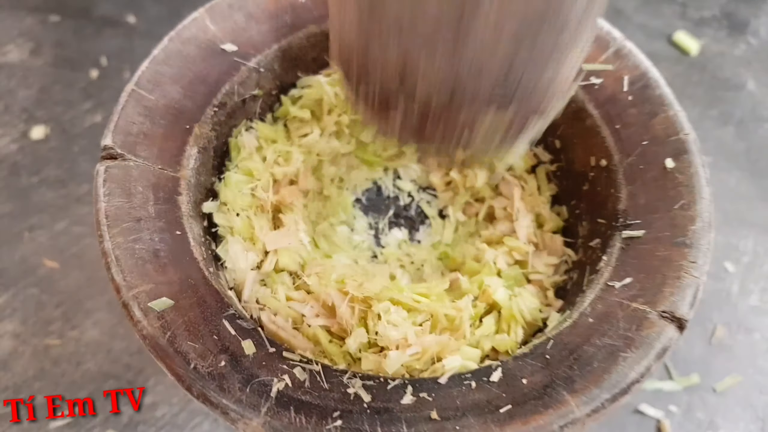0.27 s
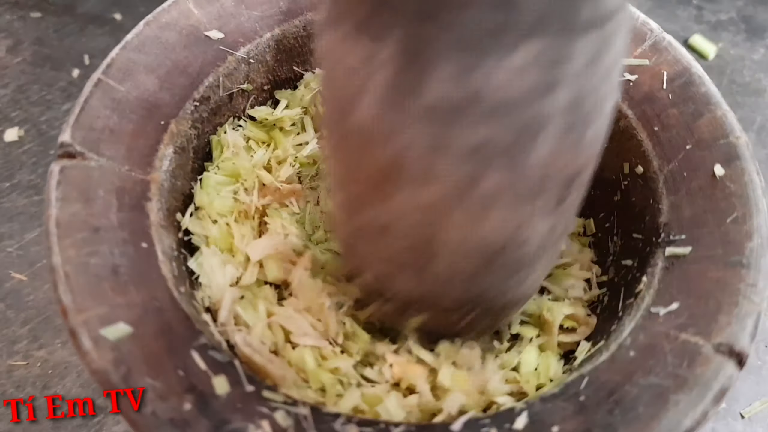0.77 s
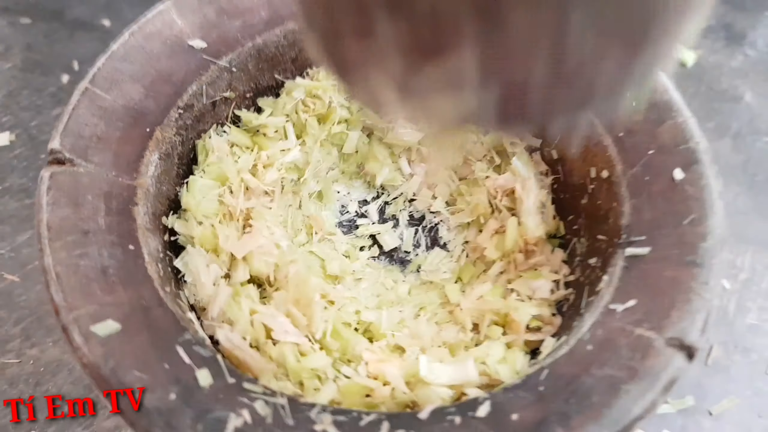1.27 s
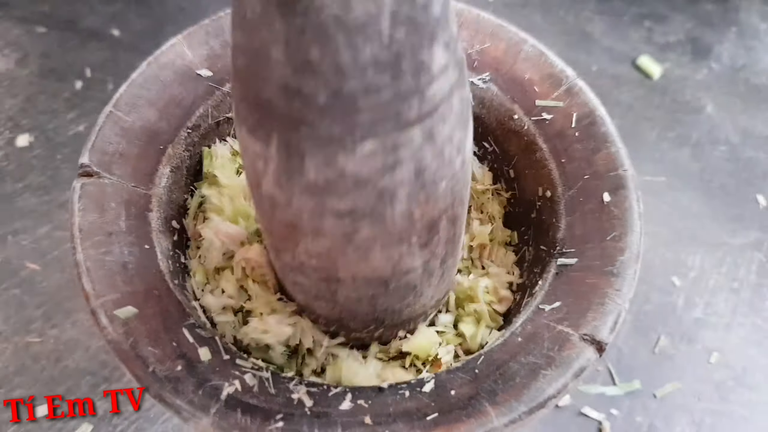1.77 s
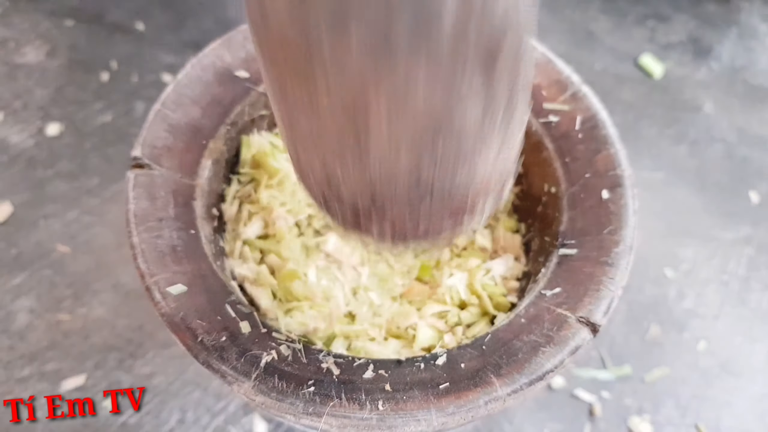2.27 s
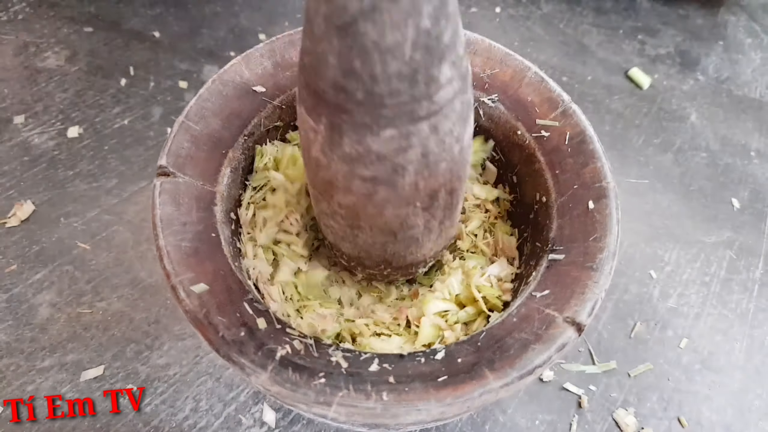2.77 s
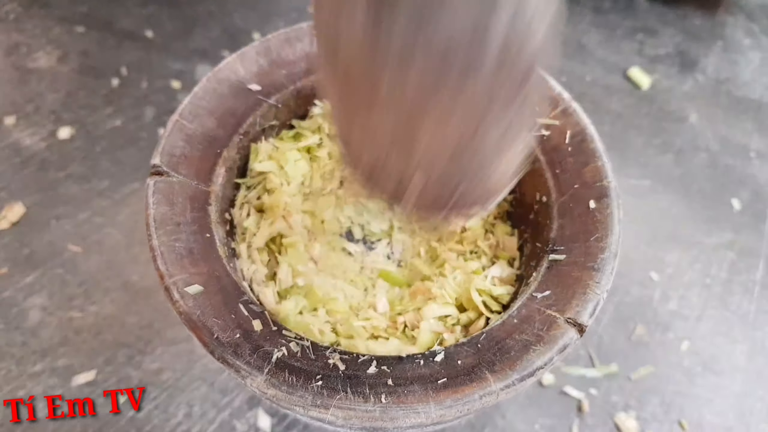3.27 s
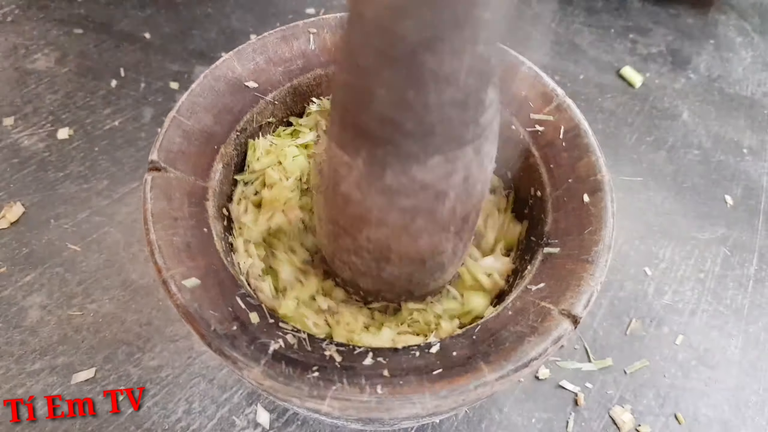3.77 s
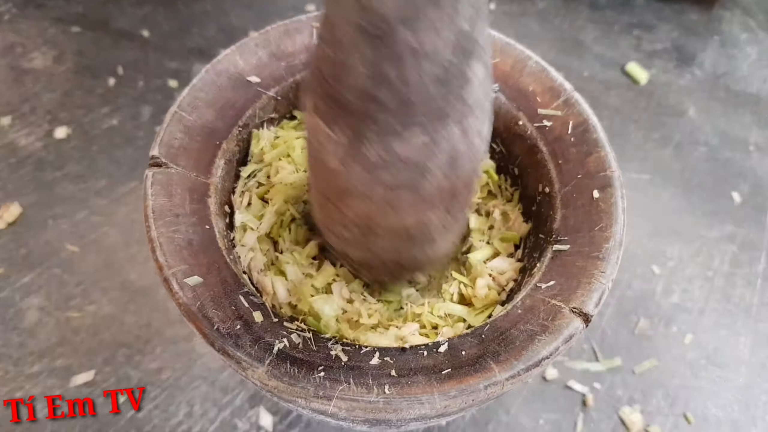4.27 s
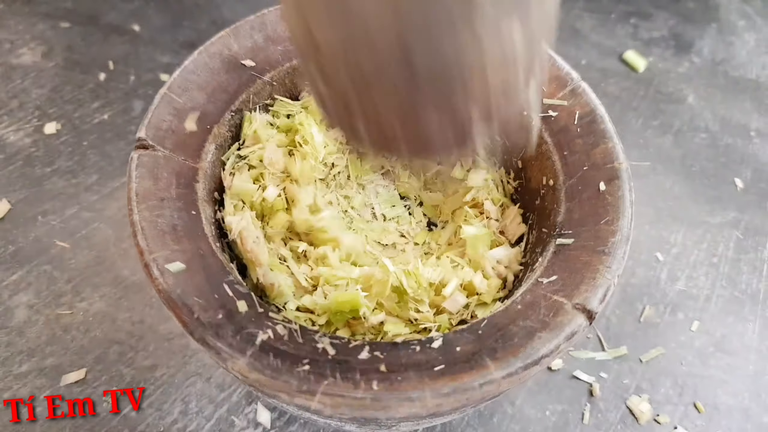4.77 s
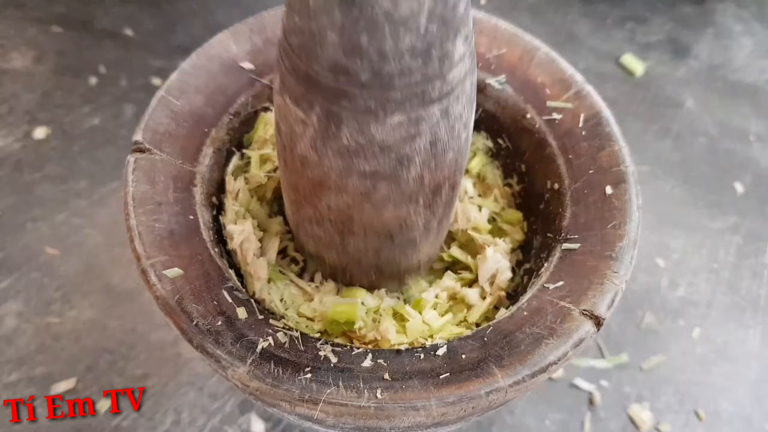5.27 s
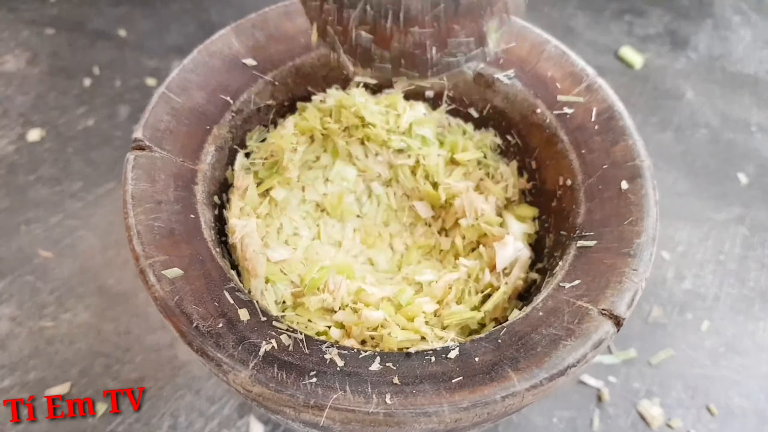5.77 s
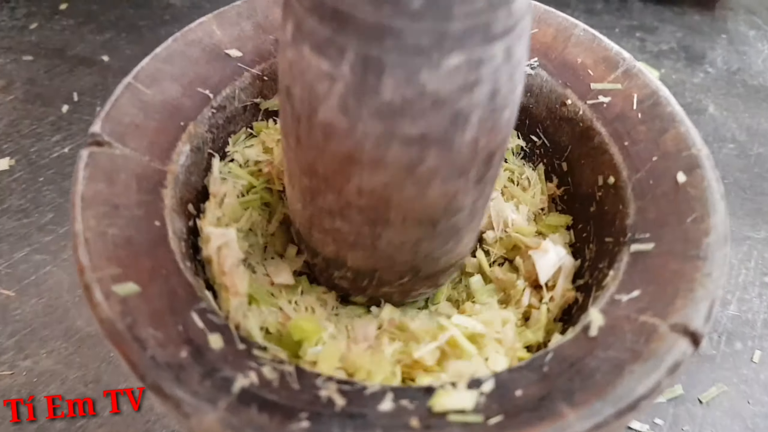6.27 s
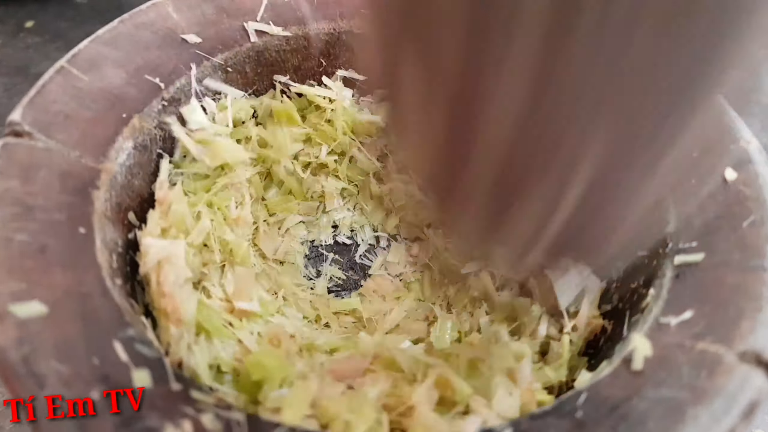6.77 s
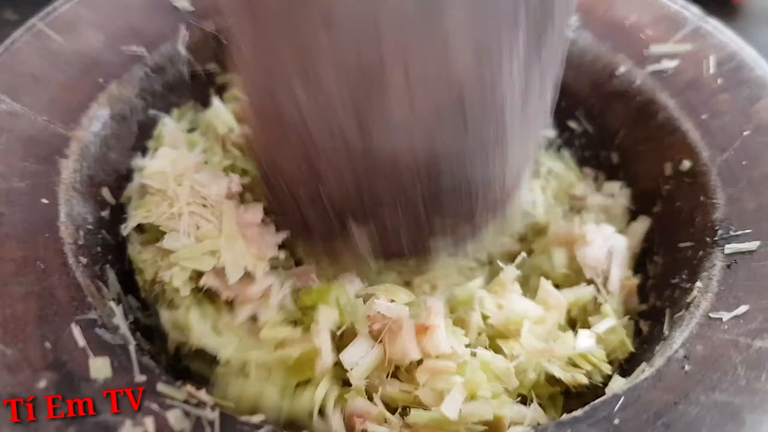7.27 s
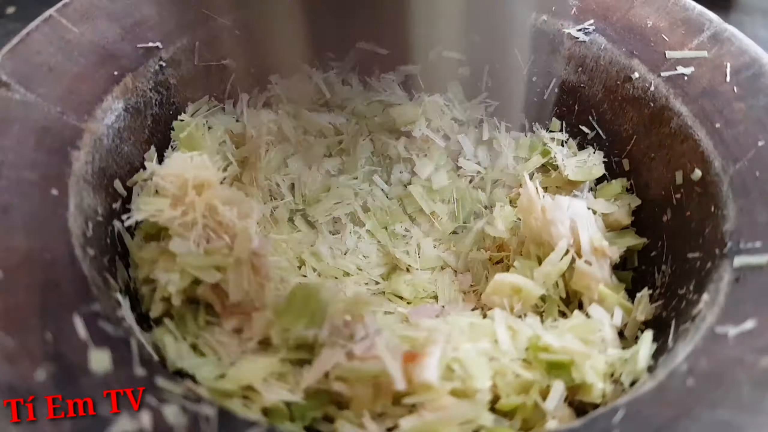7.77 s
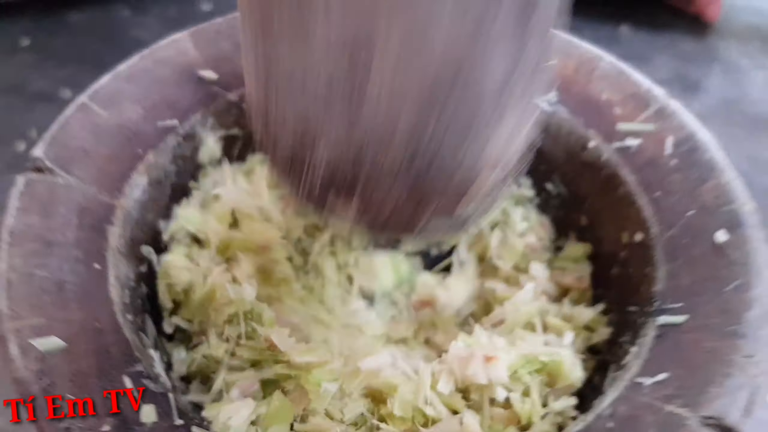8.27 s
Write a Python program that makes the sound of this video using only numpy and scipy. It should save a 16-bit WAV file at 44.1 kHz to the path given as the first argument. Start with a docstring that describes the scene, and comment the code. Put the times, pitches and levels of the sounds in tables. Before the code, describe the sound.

Close to a phone microphone, a heavy wooden pestle pounds chopped lemongrass in a wooden mortar about three times a second. Each stroke combines a short fibrous crunch, a dull low thud and a sharp woody knock, often doubled as the mortar rocks. The small hard kitchen adds a brief tail. Faint hiss and room murmur continue beneath, with two barely audible far coos and one distant clink.

```python
"""Microphone hiss and a low room murmur run from start to end, drifting in level.
From 0.1 s a wooden pestle pounds chopped lemongrass in a wooden mortar, three strokes a second, close to a phone:
noise grains make the crunch, fading low tones the thud, then short tones and filtered noise the knock of wood on
wood, often twice as the mortar rocks. A small hard kitchen answers each blow with a short noise tail.
A faint far coo, a narrow band of noise, calls at 1.3 s and 5.4 s; a far clink of short tones sounds at 6.4 s."""
import sys
import numpy as np
from scipy import signal
from scipy.fft import rfft, irfft, next_fast_len
from scipy.io import wavfile

SR = 44100
rng = np.random.default_rng(int(sys.argv[2]) if len(sys.argv) > 2 else 0)


def wrap_up_sound(samples):
    """Save the sound to the file named by the first command line argument, as 16-bit audio."""
    columns = np.atleast_2d(samples).T
    # keep every value between -1 and 1, then stretch to whole-number steps
    tamed = np.clip(columns, -1, 1)
    steps = np.round(tamed * 32767).astype(np.int16)
    wavfile.write(sys.argv[1], SR, steps)


def invert_db(x):
    """Field ratio 10**(x/20) for x, a level in decibels (scalar or array-like)."""
    u = np.asarray(x, float) / 20
    return 10 ** u


N = 374850  # samples in the scene: 8.5 s

# All levels are relative: each source sets its own balance.
# The pestle lands in the pulp: (t/s, crunch level/dB, thud level/dB, floor shake level/dB)
LANDINGS = [(0.103, -48, -70.5, -74), (0.1286, -26, -28, -42.5), (0.5023, -27, -31.5, -45),
            (0.8125, -38.5, -44.5, -50.5), (1.058, -44.5, -70, -75.5), (1.1457, -30, -28.5, -46),
            (1.514, -26, -33.5, -43), (1.8141, -33.5, -35, -55), (2.1542, -29, -36.5, -54),
            (2.4815, -22, -21.5, -34), (2.8372, -19.5, -22.5, -31), (3.1922, -18.5, -18.5, -38),
            (3.5482, -18.5, -17, -44), (3.864, -23, -31.5, -48), (4.227, -16.5, -22, -39),
            (4.5751, -29, -27.5, -50.5), (4.582, -19, -35, -38), (4.9179, -18.5, -17.5, -41.5),
            (5.258, -24.5, -31.5, -64), (5.5975, -26.5, -29, -44), (5.949, -28.5, -35.5, -46.5),
            (6.2714, -22, -20.5, -31), (6.583, -26, -24, -33), (6.9017, -21, -22.5, -32),
            (7.233, -24, -22, -31.5), (7.5526, -22.5, -30.5, -36.5), (7.906, -23.5, -19, -39),
            (8.2228, -22, -28, -30.5), (8.3641, -35, -60, -73)]
# Wood on wood: (t/s, whole level/dB, belly level/dB, rim level/dB, ringing level/dB).
# Deep pulp feeds the belly, a blow high on the wall feeds the rim.
KNOCKS = [ (.1307, -8.5, -26, 4, -13), (0.1366, -15, -22.5, 3.5, -1.5), (.505, -10, -5.5, -1, -12),
          (.516, -3.5, -22, -23.5, -19.5), (0.819, -25.5, -19, -26, -15.5), (.841, -45, -2, -9.5, -11.5),
          (1.066, -60, 2.5, 6.5, -1), (1.147, -21, 1, -5.5, -11), (1.156, -13.5, -16, -18, -24.5),
          (1.528, -6.5, -15, -14.5, -15.5), (1.815, -16, -26, -13, -11), (1.838, -4.5, -31.5, -13.5, -15),
          (2.162, -5.5, -41.5, -6.5, -10.5), (2.174, -17, -11.5, -12, -8.5),
          (2.48, -18.5, -8.5, -14, -13.5), (2.841, -7, -7.5, -8.5, -16), (2.849, -25.5, -19, -14.5, -4.5),
          (3.194, -4, -6, -5.5, -14), (3.55, -11, -0.5, -5.5, -13.5), (3.558, -16, -27, -15.5, -17),
          (3.871, -6, -33.5, -16, -9.5), (4.229, -14, -10, -8.5, -7.5), (4.238, -3, -25, -14, -17.5),
          (4.573, -6, -27, -1.5, -11), (4.578, -17, -12, -11.5, -1), (4.599, -5.5, -27, -2.5, -7),
          (4.61, -19, -19.5, 1.5, -4.5), (4.921, -11, -7.5, -11.5, -16.5), (5.269, -4, -35.5, -15.5, -11),
          (5.613, -4, -32.5, -15.5, -10), (5.624, -28, -0.5, 5.5, -3), (5.961, -5, -18.5, -19.5, -14.5),
          (6.2722, -6.5, -31, -18.5, -16), (6.3118, -27.5, -9, -20, -13), (6.5812, -9, -3, -0.5, -8),
          (6.911, -15.5, -13.5, -13, -16), (7.236, -7.5, -17, -3, -9), (7.258, -14.5, -6.5, -26, -11.5),
          (7.2683, -7, -40, -4.5, -12), (7.281, -25.5, -3.5, -15, -5), (7.2963, -14, -16, -17, -15),
          (7.552, -7, -13.5, -1, -14), (7.579, -6.5, -35.5, -23, -10.5), (7.583, -9.5, -8, -6, -6),
          (7.909, -9.5, -7.5, -3.5, -20), (8.225, -3.5, -24, -12.5, -17.5),
          (8.242, -2.5, -25, -17.5, -14.5), (8.2744, -19.5, -6.5, -24, -12), (8.365, -33.5, -3.5, 2, -8.5),
          (8.405, -52, 6.5, -9, -10.5)]
# The broad knock of belly, wall, rim and edge: (f/Hz, width/Hz, level/dB)
KNOCK_PARTS = [(506, 544, 4.5), (1208, 720, 3.5), (1770, 915, 6), (3230, 1600, 9.5)]
# Borders between those four parts: f/Hz
PART_BORDERS = [750, 1500, 2600]
# Tones at which mortar and pestle ring freely: (f/Hz, level/dB, time to fall 60 dB/s)
WOOD_TONES = [(490, -1, .16), (576, -7, .08), (670, -1, .09), (865, -3, .1), (1035, -4, .08),
              (1170, -6, .06), (1270, -5, .07), (1480, -3, .06), (1600, -5, .06), (1725, .5, .08),
              (2120, -8, .06), (2300, -7, .08), (2450, -8, .07), (3330, -7, .04), (3470, -4, .06),
              (5340, -20, .03)]
# The mortar thudding on the floor: (f/Hz, level/dB, time to fall 60 dB/s)
THUD_TONES = [(198, -9, .36), (245, -11, .16), (328, -9, .2), (405, -11, .12)]
# The floor slab shaking: (f/Hz, level/dB, time to fall 60 dB/s)
SLAB_TONES = [(47, -2.5, 0.74), (57.4, 9.5, 0.33), (100, -3.5, 0.083), (121, -2.5, 0.083)]
# Tone colour of the snapping fibres: (f/Hz, level/dB)
FIBRE_COLOUR = [(800, -24.5), (2500, 0.5), (5000, -1.5), (7800, -6), (10500, 2.5), (15000, -11.5),
                (16600, -24.5)]
# Something set down across the room: (t/s, level/dB)
CLINKS = [(6.416, -31.5)]
# The tones of that clink: (f/Hz, level/dB, time to fall 60 dB/s)
CLINK_TONES = [(1245, -2, .05), (1300, -6, .07), (1960, -10, .02), (2336, -9, .02)]
# Calls of the far coo: (start t/s, length/s, level/dB)
COO_CALLS = [(1.27, 1.18, -76), (5.42, .82, -75)]
# The background drifts: (t/s, hiss level/dB)
BACKGROUND_DRIFT = [(0.0, -67), (0.38, -71.5), (0.871, -73), (1.68, -69), (2.402, -68.5), (2.602, -64.5),
                    (4.588, -62), (4.708, -64), (5.999, -64.5), (6.441, -63), (7.9, -66), (8.5, -65)]
# Tone colour of the hiss: (f/Hz, level/dB)
HISS_COLOUR = [(400, -11.5), (1300, -2.5), (4700, -3.5), (7800, -7.5), (8900, -1.5), (11600, -1.5),
               (15100, -3), (15800, -32.5)]
# Tone colour of the murmur: (f/Hz, level/dB)
MURMUR_COLOUR = [(18, -26), (32, -1), (60, 11), (190, -1.5), (480, -8), (900, -11), (1800, -39.5)]
# How alike the murmur is on left and right: (f/Hz, likeness, 1 = fully alike)
MURMUR_ALIKE = [(60, 1), (290, 0.28), (640, 0.89), (1400, .05)]
# How far the right port lags behind the left: (f/Hz, lag/radians)
PORT_LAG = [(100, .01), (700, 0.076), (1100, 1.7), (1600, 0.4), (2150, 3.8), (2700, 6.6), (16000, 35)]
# Port balance before the turn of the phone: (f/Hz, left minus right level/dB)
PORT_TILT = [(50, 9), (130, 2.5), (1500, 5), (2100, -6.5), (3000, 5), (5000, 12.5), (14000, 11)]
# How fast the room dies away: (f/Hz, time to fall 60 dB/s)
ROOM_DECAY = [(100, 0.077), (500, 0.34), (2000, 0.22), (5000, .22), (12000, 0.29)]
# The phone turns, which moves the balance: (t/s, added left minus right level/dB)
PHONE_TURN = [(0, -2), (5.5, -1), (7.2, -0.5), (8.5, 0.5)]

SPAN, LEAD = 16384, 512  # samples a blow may last; samples kept before each blow
BLOW_TIME = np.arange(SPAN) / SR  # s
BLOW_HZ = np.fft.rfftfreq(SPAN, 1 / SR)


def unit(x):
    """Scale a sound so that its average power is 1."""
    return x / np.sqrt(np.mean(x ** 2) + 1e-20)


def along(points, hz):
    """Read a value between (f/Hz, value) points, on a log frequency axis."""
    f, value = np.transpose(points)
    return np.interp(np.log(hz + 1), np.log(f + 1), value)


def filtered(x, response):
    """Make each frequency stronger or weaker, as the response function says."""
    size = next_fast_len(x.shape[-1] + SR // 4)
    spectrum = rfft(x, size) * response(np.fft.rfftfreq(size, 1 / SR))
    return irfft(spectrum, size)[..., :x.shape[-1]]


def ring(tones, scatter_db, attack, flutter):
    """Fading tones, one per row; slow random noise roughens each tone in size and phase."""
    hz, db, t60 = np.transpose(tones)[:, :, None]
    chance = rng.standard_normal((len(tones), 1))  # a new strength for every blow
    knots = rng.standard_normal((2, len(tones), SPAN // 256 + 2))  # new random values every 6 ms
    step, rest = np.divmod(np.arange(SPAN), 256)
    slow = knots[..., step] * (1 - rest / 256) + knots[..., step + 1] * rest / 256
    angle = 2 * np.pi * hz * BLOW_TIME
    wave = (1 + flutter * slow[0]) * np.sin(angle) + flutter * slow[1] * np.cos(angle)
    fade = invert_db(db + scatter_db * chance - 60 * BLOW_TIME / t60)
    return fade * (1 - np.exp(-BLOW_TIME / attack)) * wave


def heard(sound, wet_db):
    """Direct sound reaches the two microphone ports; walls add a noise tail that dies at its own rate per pitch."""
    hz, t, z = signal.stft(rng.standard_normal((2, SPAN)), SR, nperseg=256)
    fade = invert_db(-60 * t / along(ROOM_DECAY, hz)[:, None])
    tail = signal.istft(z * fade, SR, nperseg=256)[1][:, :SPAN]
    tail = tail * np.clip(BLOW_TIME / 0.0017, 0, 1) / np.linalg.norm(tail[0])  # fades in over 1.7 ms
    lag = np.interp(BLOW_HZ, *np.transpose(PORT_LAG))
    balance = invert_db(np.outer([.5, -.5], along(PORT_TILT, BLOW_HZ)))
    ports = balance * [np.ones_like(lag), np.exp(-1j * lag)]
    both = irfft(rfft(sound) * (ports + invert_db(wet_db) * rfft(tail)))
    both = np.roll(both, LEAD, axis=1)
    return both * signal.windows.tukey(SPAN, 2 * LEAD / SPAN)


def add(track, s, sound):
    """Mix in a stereo sound at time s, with the left-right balance that the turn of the phone gives."""
    turn_db = np.interp(s, *np.transpose(PHONE_TURN))
    start = round(s * SR) - LEAD
    track[:, start:][:, :SPAN] += sound * invert_db(turn_db * np.array([[.5], [-.5]]))


def softened_by_pestle(hz):
    """Wood is too soft to click; the blow also runs up the pestle and returns, again and again."""
    soft = 1 / (1 + 1j * hz / 6000) ** 4
    return soft / (1 - .25 * np.exp(-2j * np.pi * hz * .00197))  # each return is 1.97 ms later, at a quarter


def knocks():
    """A very short contact sets off four broad parts of the wood and its fading tones; bare blows fill the room more."""
    out, t = np.zeros((2, N + SPAN)), BLOW_TIME
    hz, width, db = np.transpose(KNOCK_PARTS)[:, :, None]
    part_of_tone = np.searchsorted(PART_BORDERS, [tone[0] for tone in WOOD_TONES])
    for s, whole_db, belly_db, rim_db, ringing_db in KNOCKS:
        edge_db = -9.5 + 0.95 * rim_db  # the edge under the rim follows the rim
        parts = invert_db(db + [[belly_db], [0], [rim_db], [edge_db]])
        decay = np.pi * width * t
        pitch = hz * rng.normal(1, .03, (4, 1))
        broad = np.e * decay * np.exp(-decay) * np.sin(2 * np.pi * pitch * t)
        tones = ring(WOOD_TONES, scatter_db=2.5, attack=.002, flutter=1.5)
        # loose pulp rattles on the wall
        grit = filtered(rng.standard_normal(SPAN), lambda f: 1 / (1 + ((f - 3900) / 1800) ** 6))
        broad[3] += invert_db(ringing_db - 0.5 - 60 * t / 0.073) * grit
        contact = filtered((parts * broad).sum(0), softened_by_pestle)
        ringing = invert_db(ringing_db - 12) * (parts[part_of_tone] * tones).sum(0)
        add(out, s, heard(invert_db(whole_db) * (contact + ringing), wet_db=ringing_db - 4))
    return out[:, :N]


def landings():
    """Fibres snap in a dense burst under the pestle; the weight thuds through the mortar into the floor."""
    out, t = np.zeros((2, N + SPAN)), BLOW_TIME
    for s, crunch_db, thud_db, shake_db in LANDINGS:
        # noise whose strength jumps every 16 samples
        grains = rng.standard_normal(SPAN) * invert_db(3 * rng.standard_normal(SPAN // 16).repeat(16))
        fibres = unit(filtered(grains, lambda hz: invert_db(along(FIBRE_COLOUR, hz))))
        crush = np.e * t / 0.0015 * np.exp(-t / 0.0013)
        settling = invert_db(-16.5 - 60 * t / 0.08)  # the pulp settles after the crush
        crunch = invert_db(crunch_db - 7.5) * (crush + settling) * fibres
        push = 2.6 * np.sin(2 * np.pi * 270 * t) * invert_db(-60 * t / .028)
        mortar = ring(THUD_TONES, scatter_db=2, attack=.003, flutter=.55).sum(0)
        thud = invert_db(thud_db - 4) * (push + mortar)
        give = (t / .016 * np.exp(1 - t / .016)) ** 3  # the slab gives once, a little late: strongest at 16 ms
        jolt = 2.5 * np.sin(2 * np.pi * 58 * t) * give
        slab = ring(SLAB_TONES, scatter_db=2, attack=.02, flutter=.6).sum(0)
        shake = invert_db(shake_db - 6.5) * (jolt + slab)
        add(out, s, heard(crunch + thud, wet_db=-11))
        add(out, s, heard(shake, wet_db=-15) * invert_db([[2.5], [-2.5]]))  # stronger on the left
    return out[:, :N]


def clink():
    """A far clink: short tones and a burst of noise, with a strong room tail."""
    out = np.zeros((2, N + SPAN))
    for s, db in CLINKS:
        tones = ring(CLINK_TONES, scatter_db=1, attack=.0015, flutter=.5).sum(0)
        burst = rng.standard_normal(SPAN) * invert_db(-60 * BLOW_TIME / 0.017)
        tap = 1.9 * filtered(burst, lambda hz: 1 / (1 + ((hz - 2200) / 1300) ** 4))
        both = heard(invert_db(db) * (tones + tap), wet_db=-1.5)
        add(out, s, both[::-1])  # left and right swapped
    return out[:, :N]


def coo():
    """A narrow band of noise makes a fuzzy tone from far outside, strongest near the start and end of each call."""
    t, level = np.arange(N) / SR, 0
    for s, length, db in COO_CALLS:
        sag = 4.5 * np.sin(np.pi * (t - s) / length) ** 2  # dB, deepest in mid-call
        edges = np.clip(np.minimum(t - s, s + length - t) / .06, 0, 1)  # 60 ms rise and fall
        level = level + invert_db(db - sag) * edges
    tone = filtered(rng.standard_normal(N), lambda hz: 1 / (1 + ((hz - 748) / 22) ** 4))
    return level * unit(tone)


def murmur_colour(hz):
    """Share the murmur between the middle and the sides, so that left and right are as alike as the table says."""
    turn = np.arccos(np.clip(along(MURMUR_ALIKE, hz), -1, 1)) / 2
    return invert_db(along(MURMUR_COLOUR, hz)) * [np.cos(turn), np.sin(turn)]


def background():
    """Each port has random hiss of its own; the low murmur is noise partly shared by both."""
    hiss_db = np.interp(np.arange(N) / SR, *np.transpose(BACKGROUND_DRIFT))
    murmur_db = -62.5 + 0.93 * (hiss_db - hiss_db.mean())  # follows most of the hiss drift
    hiss = unit(filtered(rng.standard_normal((2, N)), lambda hz: invert_db(along(HISS_COLOUR, hz))))
    mid, side = filtered(rng.standard_normal((2, N)), murmur_colour)
    murmur = unit(np.array([mid + side, mid - side]))
    return invert_db(hiss_db + [[2.5], [4]]) * hiss + invert_db(murmur_db) * murmur


def scene():
    """All sources together at the two ports."""
    return knocks() + landings() + clink() + coo() + background()


def bass_cut(hz):
    """A steep cut below about 42 Hz, which also delays the lowest thump."""
    s = 1j * hz / 42
    return s ** 4 / (1 + 2.22 * s + s ** 2) ** 2


def roll_off(x):
    """The treble ends steeply here."""
    return signal.sosfilt(signal.butter(12, 16510, fs=SR, output="sos"), x)


def record(dry):
    """The bass is cut, then peaks are smoothly held to full scale."""
    x = filtered(dry, bass_cut)
    x = x / (1 + np.abs(x) ** 12) ** (1 / 12)
    return roll_off(x)


dry = scene()
out = record(dry)
wrap_up_sound(out)
```